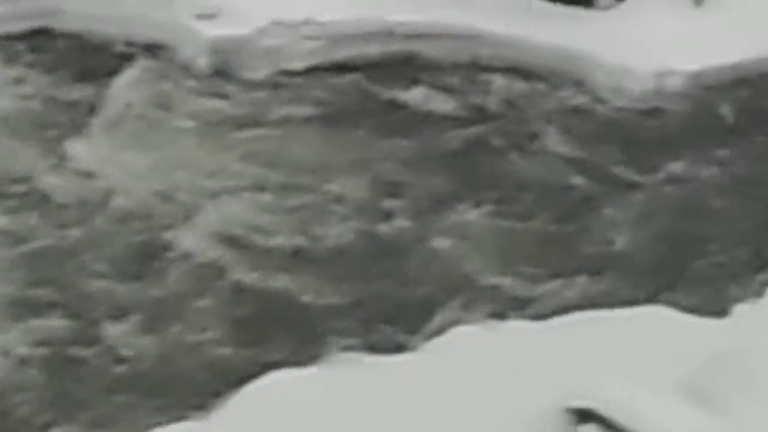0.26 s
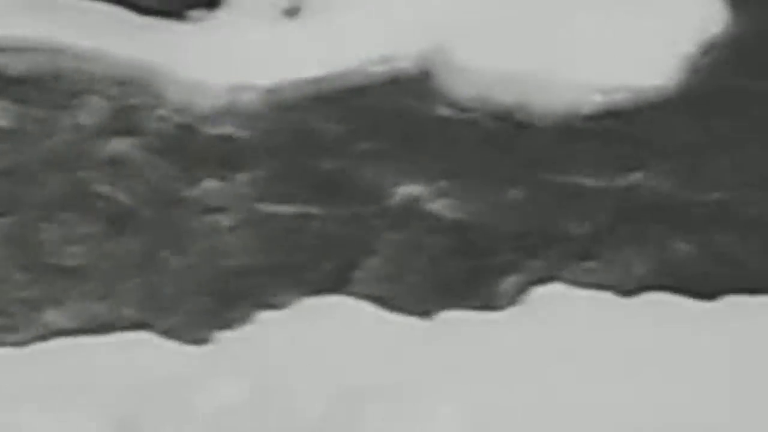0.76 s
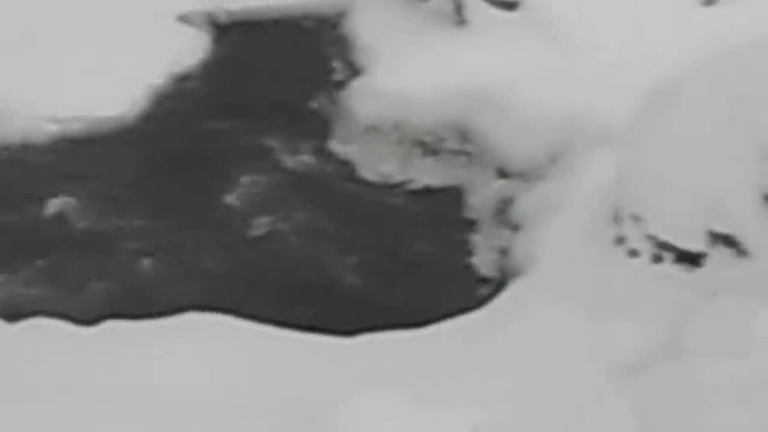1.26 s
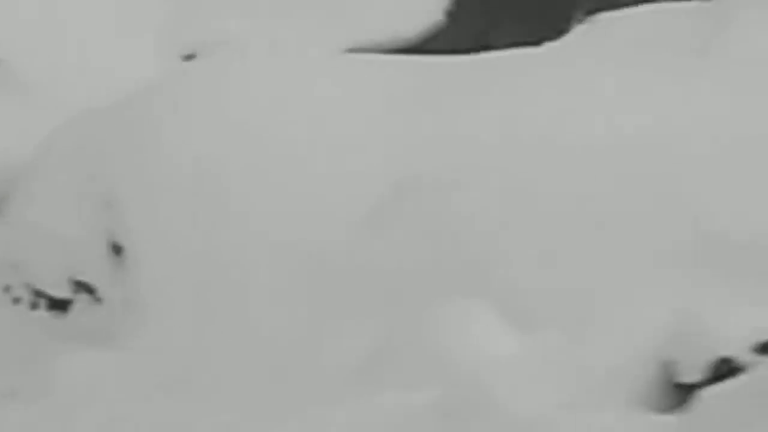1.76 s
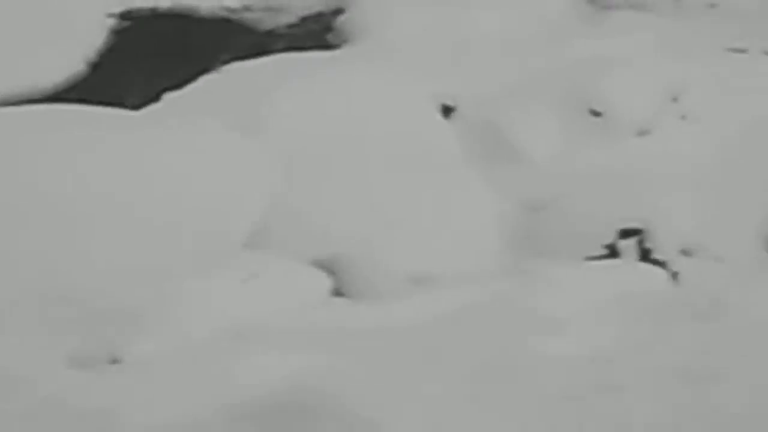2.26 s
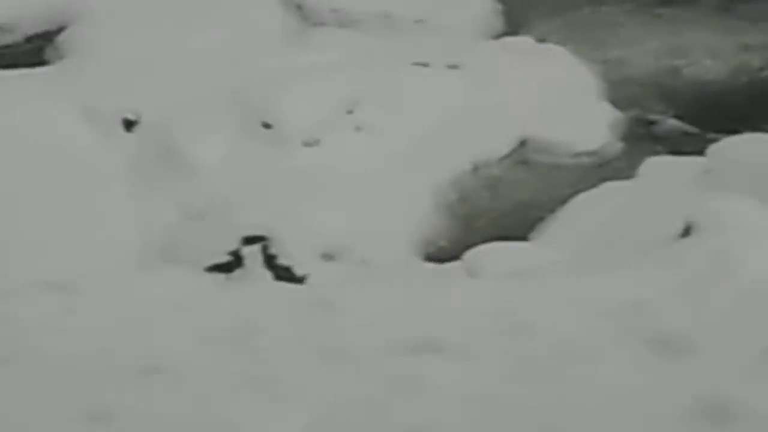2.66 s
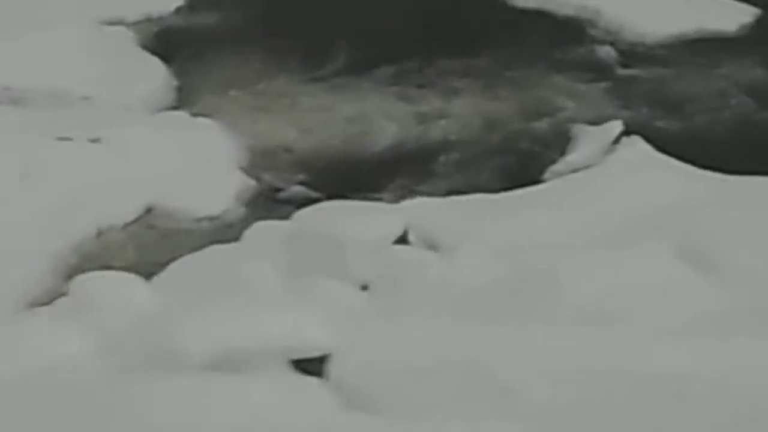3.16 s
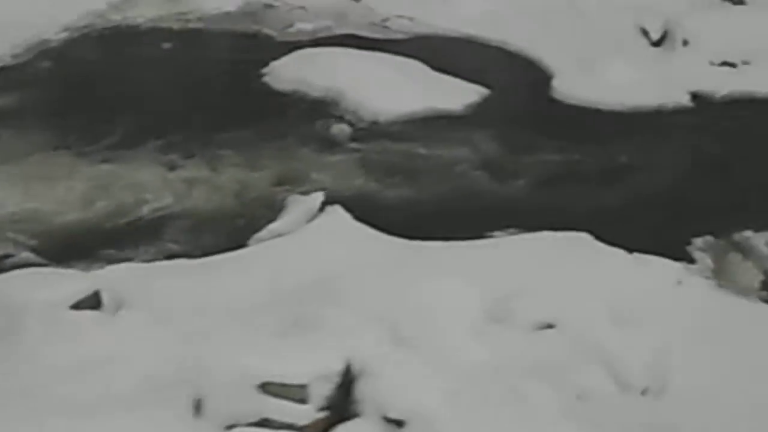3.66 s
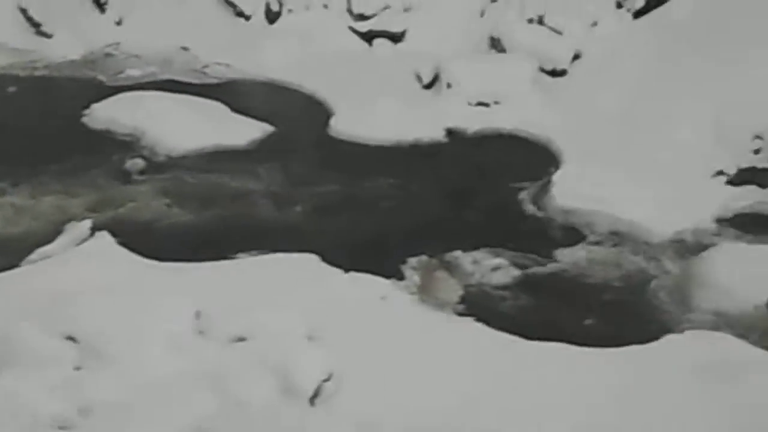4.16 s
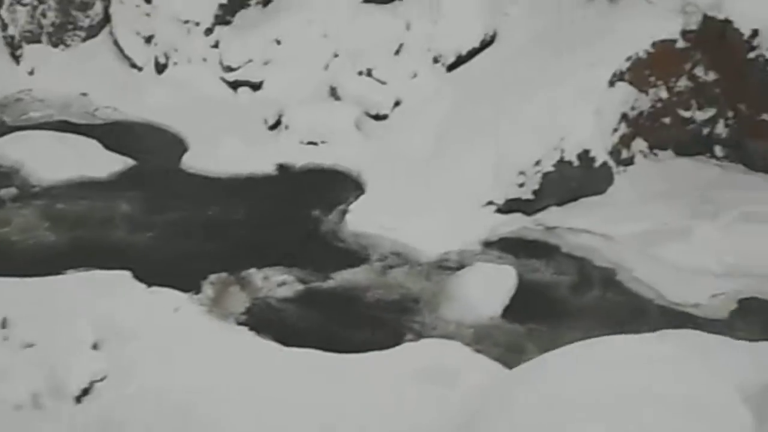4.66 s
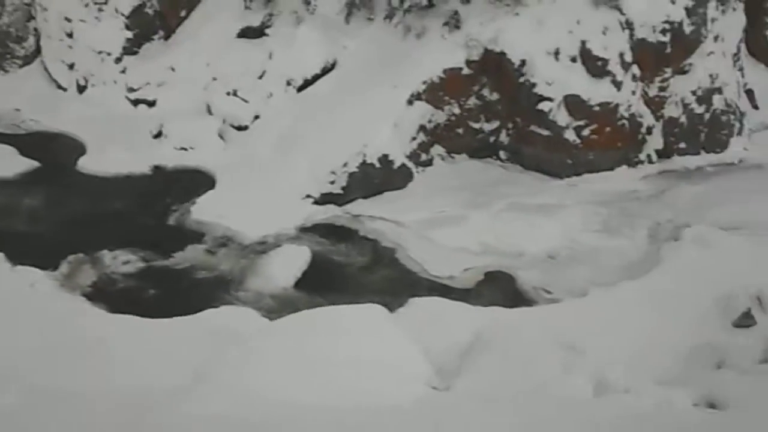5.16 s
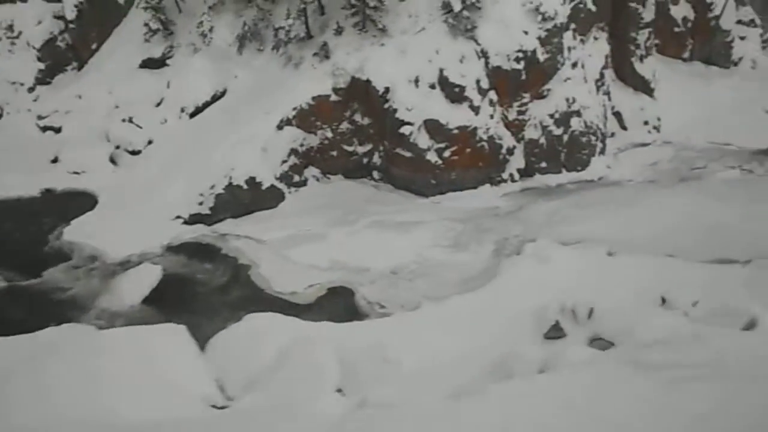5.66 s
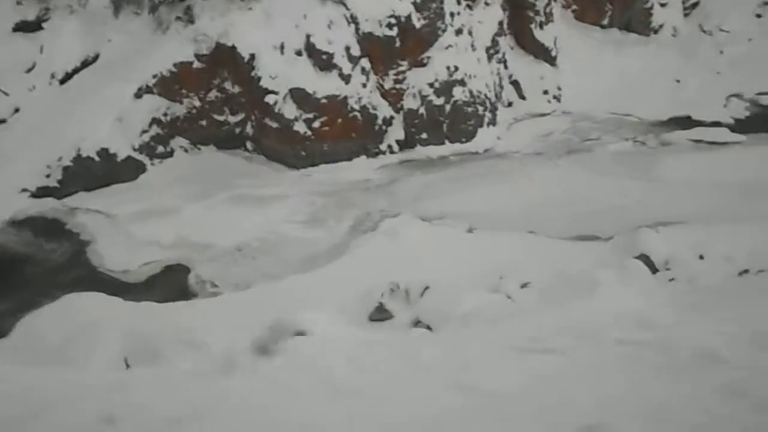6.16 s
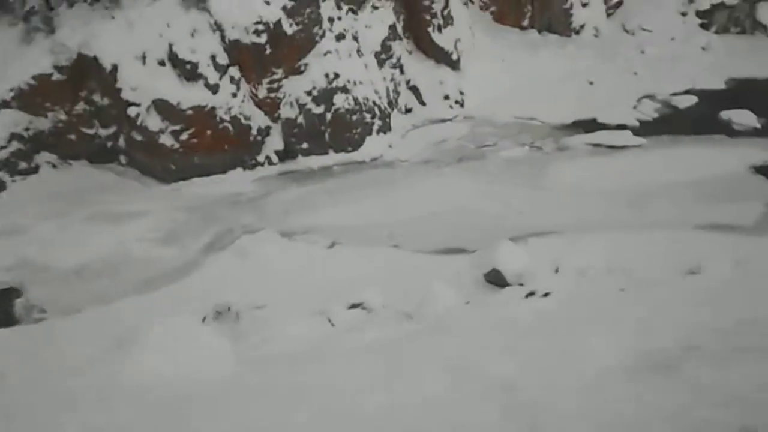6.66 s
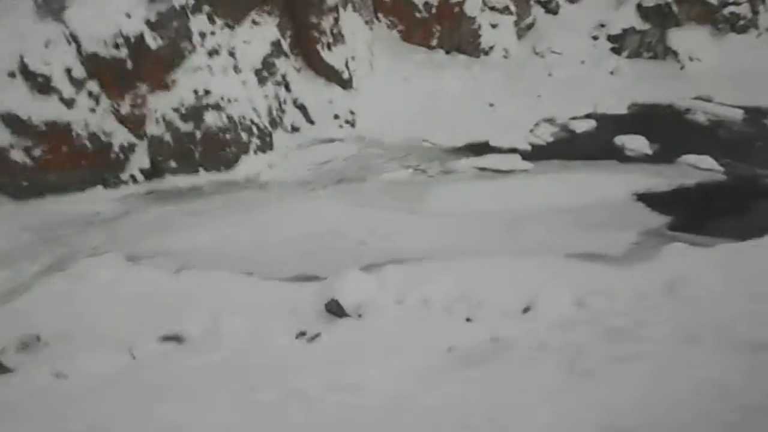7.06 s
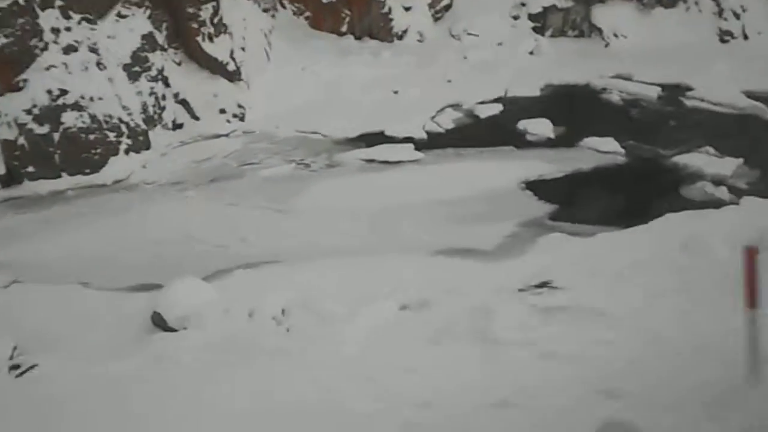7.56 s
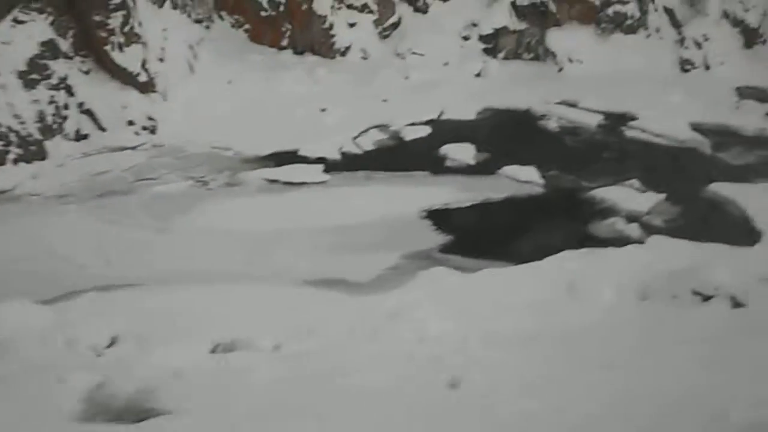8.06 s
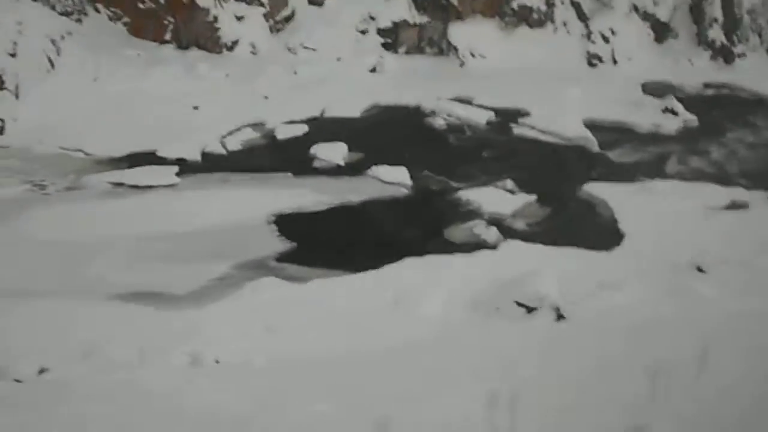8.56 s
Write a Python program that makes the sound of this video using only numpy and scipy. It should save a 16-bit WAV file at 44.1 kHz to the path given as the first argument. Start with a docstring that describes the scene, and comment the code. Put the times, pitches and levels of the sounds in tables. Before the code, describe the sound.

A train rolls slowly for about nine seconds, heard from a window seat inside a padded carriage. A low rumble and muffled wheel roar run throughout, with a soft, rapid motor throb, a faint hum, thin hiss and very faint high singing from the wheels. In the first second, panels rub and loose fittings click close to the microphone. Scattered clicks continue, and around 2.5 to 3 seconds the track jolts the carriage, bringing a deeper boom, dull thumps under the floor and a cluster of clicks. More single clicks and soft knocks fall between 4 and 5.5 seconds. At 6 seconds a nearby fitting gives one brief squeak with a sharp click. Soft creaking and further clicks follow around 7 seconds and just before 8, and two more low bumps come between 8 and 8.5 seconds as the rumble carries on.

```python
"""A low sway and a booming floor, heard from a window seat in a slowly rolling railway carriage.
Uneven track shakes the body, more so at each jolt; the wheels roar through the walls and sing faintly.
A small motor knocks its housing about 21 times a second over a faint hum; the running gear thumps below.
Panels rub as the carriage flexes. Close to the microphone loose fittings click in a short, padded echo,
and at 6 s one of them sticks and slips in a brief squeak. Mono, with a thin airy hiss behind it all."""
import sys
import numpy as np
from scipy import signal
from scipy.fft import rfft, irfft, next_fast_len
from scipy.io import wavfile
from scipy.ndimage import uniform_filter1d

SR = 44100
rng = np.random.default_rng(int(sys.argv[2]) if len(sys.argv) > 2 else 0)


def output_pcm(signal):
    """Save a mono or channel-first signal as 16-bit PCM at the path in sys.argv[1].

    Samples are clipped to [-1, 1] before scaling.
    """
    pcm = np.clip(np.atleast_2d(signal).T, -1, 1) * 32767
    wavfile.write(sys.argv[1], SR, np.round(pcm).astype(np.int16))


N = 388962
TIME = np.arange(N) / SR

# echo of the compartment: f/Hz, t60/s
CABIN_DECAY = [(200, 0.14), (1500, 0.33), (5000, 0.27), (10000, 0.15)]
# airy hiss: f/Hz, relative density/dB
HISS_SPECTRUM = [(1200, -7), (2200, 4), (3000, 1), (4200, 0), (5000, -4.5), (6500, -6), (8200, -7.5),
                 (10000, -7), (11000, -7.5)]
# its course: t/s, relative level/dB
HISS_LEVEL = [(0, -55), (0.85, -58.5), (1.3, -57), (3.6, -58), (6.2, -56), (7.6, -58), (8.15, -55),
              (8.82, -58)]
# singing modes of the wheels: start/s, end/s, f/Hz, glide/Hz, width/Hz, level/dB
WHEEL_MODES = [(0.3, .76, 4420, -80, 420, -66), (.8, 1.7, 5250, -1, 400, -74),
               (1.303, 3.3, 3990, 0, 250, -71.5), (2.8, 5.15, 3990, -40, 200, -69),
               (3.65, 4.35, 6200, 2, 450, -76), (4.305, 4.335, 5350, -100, 250, -68),
               (4.337, 4.375, 5240, -100, 280, -62), (4.338, 4.395, 5950, 300, 400, -66),
               (4.93, 5.55, 5450, -1, 350, -70), (6.365, 6.415, 8100, -5, 400, -69.5),
               (6.425, 6.47, 7750, -200, 800, -66), (6.75, 7.75, 6250, -2, 300, -76),
               (7.79, 8.2, 5600, -1, 450, -68), (7.83, 8.2, 6660, 0, 800, -74),
               (8.15, 8.62, 5550, 5, 450, -74)]
# rubs of panels and seats: start/s, end/s, f/Hz, glide/Hz, width/Hz, level/dB
RUBS = [(0, 0.06, 4450, -2, 3500, -54), (.2, .94, 1600, 1, 1200, -58.5), (.345, .405, 944, 0, 1000, -51),
        (0.389, .56, 872, 3, 700, -55), (0.341, 0.398, 3000, 0, 3600, -52.5),
        (0.279, .85, 2750, 1, 900, -66), (0.382, .8, 5770, 0, 1400, -72),
        (1.135, 1.235, 7800, 0, 5600, -62), (2.05, 2.6, 5150, -1, 600, -70),
        (2.99, 3.23, 3700, 3, 2000, -58.5), (3.208, 5.2, 3424, 0, 1100, -70),
        (6.726, 6.837, 3840, -500, 2200, -56.5), (6.761, 7.202, 1167, -3, 800, -54.5),
        (7.85, 8.3, 5800, -400, 2200, -66), (7.959, 8.5, 3145, 399, 2100, -60),
        (8.05, 8.79, 3860, 700, 1300, -62)]
# steady hum: f/Hz, rms level/dB, wander/Hz
HUM_TONES = [(333.2, -49, .65), (614, -64.5, 1.7), (670.6, -60, 1.8), (913, -66.5, 1.8), (1004, -58, 1.05),
             (1687, -71.5, 1.81)]
# speed of the motor: t/s, rate/Hz
MOTOR_SPEED = [(0, 20.73), (0.8, 20.43), (1.3, 20.88), (3.6, 20.52), (4.2, 20.77), (6.55, 20.56),
               (6.85, 21.3), (8.82, 21.25)]
# its throb at the seat: t/s, level/dB
MOTOR_LEVEL = [(0, -42.5), (1.4, -42.5), (4.8, -42.5), (7.1, -41), (8.82, -41)]
# modes of its housing: f/Hz, relative level/dB, t60/s
HOUSING_MODES = [(162, -17, 0.027), (338.3, -11.5, 0.15), (420, 2.5, 0.089), (484, -4.5, 0.041),
                 (850, -28, 0.026)]
# knocks from under the floor: t/s, level before the envelope/dB, f/Hz
KNOCKS = [(0.068, -27, 173), (0.358, -37, 730), (1.061, -25, 119), (2.476, -30, 204), (2.533, -33, 383),
          (2.629, -20.5, 84.5), (2.631, -30.5, 263), (3.63, -38, 550), (4.226, -25.5, 145),
          (4.234, -38, 510), (5.148, -29.5, 245), (5.735, -35, 342)]
# partials of the squeak, first upward: rms level/dB, change in the tight grip/dB, growth/(dB/s)
SQUEAK_PARTIALS = [(-37, -9, 20), (-46.5, 10.5, 17), (-48, 0, -13), (-62, -4, 50), (-61, -1, 30),
                   (-60, -3, 42)]
# resonances and hollows of the panel that carries the fittings: f/Hz, width/Hz, gain/dB
PANEL_MODES = [(1620, 600, -0.5), (2200, 230, -1.5), (4150, 970, -2.5), (4800, 790, 1.5), (7200, 600, -2.5),
               (8600, 850, -4), (9400, 700, 4.5)]
# nearby clicks: t/s, level above 1800 Hz/dB, body colour/dB, treble colour/dB, t60/s, ring/Hz, ring/dB
CLICKS = [(0.078, -37, 17.5, -1.5, 0.052, 4750, 7.5), (0.2372, -45, 17, -18, 0.055, 1500, 10),
          (0.2465, -37.5, 9, -3, .067, 1650, 8), (0.2536, -37, 13, -3, 0.055, 1850, 4),
          (0.3608, -50, 13, -12, 0.13, 1300, -2), (0.4671, -46.5, 17, -2, 0.12, 2180, 3),
          (0.4918, -38.5, 15, -4, 0.078, 4700, 5), (0.514, -46, 17, -5, 0.1, 4700, 2),
          (1.061, -33.5, 13, -2, 0.042, 4760, 5), (1.4626, -46, 7, -14, 0.12, 5000, 3),
          (1.549, -38, 13, -5, .04, 4750, 8), (1.786, -33.5, 6.5, -8, 0.047, 3000, 4.5),
          (1.832, -44, -1, -17, 0.043, 3200, 2), (2.376, -37.5, 7, -12, 0.039, 2800, 6),
          (2.4528, -43, 10, -13, 0.11, 3600, 3), (2.533, -38, 12, -11, .048, 2700, 4),
          (2.5544, -31.5, 11.5, -1, 0.047, 4570, 8), (2.584, -38, 10, -6, 0.057, 5100, 5),
          (2.617, -47.5, 18, 3, 0.065, 9400, 7), (2.808, -47.5, 5, -12, 0.047, 4700, 8),
          (2.833, -37, 12, -6, 0.03, 7040, 7), (2.869, -52, 7, -12, 0.08, 4500, 9),
          (2.914, -40, 9, -6, 0.031, 7200, 5), (3.1009, -49, 5, -12, .07, 5000, 4),
          (3.9351, -36, 5.5, -12.5, 0.058, 3620, 5.5), (4.236, -42, -2, -10, 0.12, 6200, 7),
          (4.488, -48, 8, -13, 0.062, 3060, 1), (4.5426, -48.5, 6, -14, 0.054, 3480, 5),
          (4.594, -33.5, 5, -8.5, .055, 2900, 6.5), (4.6374, -44, 14, -12, 0.054, 2900, 2),
          (5.1248, -49, 4, -12, 0.064, 3610, 6), (5.157, -41, 6, -11, 0.049, 3200, 1),
          (5.3384, -38, 9.5, -8, 0.05, 5300, -1), (5.5168, -44, 9.5, -15, 0.079, 1500, 2),
          (5.5352, -42, 2, -19, 0.044, 5400, 10), (6.0077, -38.5, -3, -21, 0.032, 5300, 6),
          (6.0568, -28.5, 7, -17, 0.017, 4450, 10.5), (6.074, -44, 6, -16, 0.036, 2200, 10),
          (6.498, -36, -6, -22, 0.014, 3500, 6), (6.823, -42, 17, -7, 0.036, 4700, 6),
          (6.895, -35.5, 16, -11, 0.022, 2400, 2), (6.9246, -38.5, 14, -8, 0.03, 2350, -2),
          (6.9335, -38, 5, -7, 0.048, 4300, 4), (7.02, -36, 6.5, -5, 0.043, 1500, 4),
          (7.043, -40.5, 9, -17, 0.045, 5300, 8), (7.7292, -30, 12, -7, 0.014, 1900, 3),
          (7.745, -42, 16, -8, 0.032, 2400, 0), (7.795, -35.5, 2, -18, 0.016, 4150, 9),
          (7.968, -41, -3, -12, 0.029, 2600, 5), (8.256, -33, 4, -8, 0.034, 6300, 4),
          (8.4252, -45.5, 9, -13, 0.11, 2800, 4)]
# rolling noise through the walls: f/Hz, relative density/dB
ROAR_SPECTRUM = [(90, 1), (120, 15.5), (148, 12.5), (178, 9), (198, 4), (235, 7.5), (355, 9), (400, -1),
                 (480, 2), (540, 0), (630, -1.5), (900, -3), (965, -6.5), (1130, -4), (1750, -14.5),
                 (2100, -22.5), (4000, -58)]
# its course: t/s, relative level/dB
ROAR_LEVEL = [(0, -45), (1.4, -46), (2.6, -45.5), (3, -46), (4.3, -46), (6.2, -48.5), (6.9, -46.5),
              (7.5, -45.5), (8.2, -46.5), (8.82, -46.5)]
# its treble against the rest: t/s, gain/dB
ROAR_TREBLE = [(0, 3.5), (1.1, 3), (2.6, 1.5), (4.2, -2), (5.6, .5), (6.6, 0.5), (7.4, -3.5), (8.2, -5.5),
               (8.82, 1)]
# sway of the body: f/Hz, relative density/dB
SWAY_SPECTRUM = [(8, -6), (17, -1.5), (22, -2.5), (29, -1.5), (37, -5), (43, -25), (50, -19.5), (62, -23)]
# boom of the floor: f/Hz, relative density/dB
BOOM_SPECTRUM = [(56, -7.5), (64, -5), (72, 0), (84, -11), (103, -9), (112, -17), (135, -15), (170, -22)]
# narrow resonances of the floor: f/Hz, width/Hz, relative level/dB
FLOOR_MODES = [(74.33, 3.1, -2.5), (93.43, 4.06, -0.5)]
# shaking by the uneven track, jolts aside: t/s, sway/dB, boom/dB
RIDE = [(0, -25, -38.5), (0.9, -24.5, -38.5), (1.3, -23, -38), (1.9, -30.5, -34.5), (2.3, -23.5, -32.5),
        (2.7, -25, -29), (3.3, -23.5, -31), (3.8, -23.5, -37), (4.3, -25.5, -32), (4.9, -27.5, -36),
        (5.3, -30.5, -30.5), (5.8, -25.5, -34), (6.3, -30, -38), (6.9, -30, -40), (7.3, -32, -32.5),
        (7.9, -27.5, -41.5), (8.3, -28, -47), (8.82, -34.5, -34)]
# bumps in the track (a negative rise counts as none): t/s, sway rise/dB, boom rise/dB
JOLTS = [(0.56, 0, 11), (0.74, 6.5, 3), (1.07, 2.5, 4), (2.49, 8.5, 4), (2.65, 12.5, 1.5), (2.9, 7.5, 0.5),
         (3.16, 4, 5.5), (4.06, -2.5, 6.5), (5.1, -2, 8), (8.16, 7, 4), (8.51, 11, 2)]


def amp(db):
    """Decibels to gain."""
    return 10 ** (np.asarray(db) / 20)


def unit(x):
    """Scales to rms 1."""
    return x / np.sqrt(np.mean(x ** 2) + 1e-20)


def at_hz(points, hz):
    """Reads a table on a log-frequency axis."""
    f, value = np.transpose(points)
    return np.interp(np.log(hz + 1), np.log(f + 1), value)


def curves(rows):
    """Every column after the first as a curve in time."""
    s, *columns = np.transpose(rows)
    return [np.interp(TIME, s, c) for c in columns]


def add(mix, s, sound):
    """Mixes a sound in at s seconds."""
    part = mix[max(round(s * SR), 0):][:len(sound)]
    part += sound[:len(part)]


def noise(spectrum):
    """Noise of a given spectrum, falling steeply outside it."""
    hz = np.fft.rfftfreq(N, 1 / SR) + 1e-3
    skirts = 1 / (1 + (spectrum[0][0] / hz) ** 6 + (hz / spectrum[-1][0]) ** 6)
    return unit(irfft(rfft(rng.standard_normal(N)) * amp(at_hz(spectrum, hz)) * skirts, N))


def band(hz, width_hz, size=N):
    """Noise in one resonance; at 0 Hz, a random drift."""
    f = np.fft.rfftfreq(size, 1 / SR)
    return unit(irfft(rfft(rng.standard_normal(size)) / (1 + (2 * (f - hz) / width_hz) ** 4), size))


def sustained(x, seconds):
    """Evens out the slow swells of a vibration, keeping its quick ones."""
    size = max(int(seconds * SR), 2)
    return x / np.sqrt(uniform_filter1d(uniform_filter1d(x ** 2, size), size) + 1e-9)


def friction(strokes, fade_share):
    """Strokes of friction, each in one gliding resonance that swells and fades."""
    out = np.zeros(N)
    for start, end, hz, glide_hz, width_hz, db in strokes:
        size = max(int((end - start) * SR), 64)
        phase = 2 * np.pi * np.cumsum(hz + glide_hz * np.linspace(-.5, .5, size)) / SR
        a, b = (band(0, width_hz, next_fast_len(size))[:size] for _ in range(2))
        stroke = unit(a * np.cos(phase) + b * np.sin(phase))
        add(out, start, amp(db) * stroke * signal.windows.tukey(size, fade_share))
    return out


def cabin_echo(x):
    """The padded compartment around the microphone: sparse reflections that die quickly."""
    taps = rng.standard_normal(SR // 3) * (rng.random(SR // 3) < 2500 / SR)
    hz, t, spectra = signal.stft(taps, SR, nperseg=256)
    tail = signal.istft(spectra * amp(-60 * t / at_hz(CABIN_DECAY, hz)[:, None]), SR, nperseg=256)[1]
    return signal.fftconvolve(x, np.r_[np.zeros(SR // 300), tail / np.linalg.norm(tail)])[:N]


def air_and_wheel_song():
    """Farthest back: an airy hiss, with high modes of the wheels wavering faintly in it."""
    singing = friction(WHEEL_MODES, fade_share=0.5)
    hiss = noise(HISS_SPECTRUM) * amp(curves(HISS_LEVEL)[0] - 2 + 0.35 * band(0, 40))
    return hiss + singing * amp(3.5 * band(0, 10))


def rubbing():
    """Soft, grainy friction of panels and seats as the carriage flexes."""
    return friction(RUBS, fade_share=0.46) * amp(band(0, 200))


def hum():
    """Faint steady tones, each wandering a little in level and pitch."""
    out = np.zeros(N)
    for hz, db, wander_hz in HUM_TONES:
        gain = amp(db + 2.5 * band(0, 5.2))
        phase = 2 * np.pi * np.cumsum(hz + wander_hz * band(0, 8.9)) / SR
        out += gain * np.sin(phase)
    return np.sqrt(2) * out


def motor():
    """Each turn of a small motor gives a soft knock that rings its housing."""
    turns = np.cumsum(curves(MOTOR_SPEED)[0]) / SR + .62
    beats = np.diff(np.floor(turns), prepend=0) * amp(.5 * rng.standard_normal(N))
    t = np.arange(SR // 6) / SR
    # neighbouring modes swing against each other, so the ring takes a few ms to build
    ring = sum((-1) ** k * amp(db - 60 * t / t60) * np.sin(2 * np.pi * hz * t)
               for k, (hz, db, t60) in enumerate(HOUSING_MODES))
    throb = unit(signal.oaconvolve(beats, ring * (1 - np.exp(-t / 0.0014)))[:N])
    return amp(curves(MOTOR_LEVEL)[0]) * throb


def gear_knocks(rise_s=.003, fall_s=.026):
    """Heavily damped thumps of the running gear under the floor, too broad to have a clear pitch."""
    out, t = np.zeros(N), np.arange(SR // 4) / SR
    for s, db, hz in KNOCKS:
        thump = sustained(band(hz, 1.05 * hz, len(t)), .02)
        add(out, s, amp(db) * thump * (1 - np.exp(-t / rise_s)) * np.exp(-t / fall_s))
    return out


def squeak(centre_s=6.008, swell_s=0.06, grip_at_s=5.998, grip_s=0.02):
    """A nearby fitting sticks and slips; in the tightest grip the pitch sags and the octave takes over."""
    t = np.arange(-SR // 4, SR // 4) / SR  # from the middle of the push
    swell = np.exp(-(t / swell_s) ** 4)
    grip = np.exp(-((centre_s + t - grip_at_s) / grip_s) ** 2)
    pitch_hz = 576 - 12 * grip - 80 * t
    jitter = 1 + 0.03 * band(0, 470, len(t))
    phase = 2 * np.pi * np.cumsum(pitch_hz * jitter) / SR
    tone = np.zeros(len(t))
    for k, (db, grip_db, growth) in enumerate(SQUEAK_PARTIALS, 1):
        shake_db = 2.5 * band(0, 130, len(t))
        tone += np.sqrt(2) * amp(db + grip_db * grip + growth * t + shake_db) * np.sin(k * phase)
    rub = amp(-53.5) * band(2900, 6600, len(t)) * (1 + 0.58 * np.cos(phase))
    out = np.zeros(N)
    add(out, centre_s + t[0], swell * (tone + rub))
    return out


def click(body_db, treble_db, t60, ring_hz, ring_db, slips_per_s=3600, ring_width_hz=950):
    """A dry crack: a sharp first break, then tiny dying slips that ring the fitting and its panel."""
    t = np.arange(4096) / SR
    hz = np.fft.rfftfreq(len(t), 1 / SR)
    decay = amp(-60 * t / max(t60, .01))
    catches = rng.random(len(t)) < slips_per_s / SR
    slips = rng.standard_normal(len(t)) * (catches + 0.18) * (1 - np.exp(-t / 0.0009)) * decay
    # the shorter the click, the more of it lies in the first break
    share = np.exp(-(t60 / 0.03) ** 2)
    burst = np.sqrt(share) * (t == 0) + np.sqrt(1 - share) * slips / np.linalg.norm(slips)
    colour = [(100, -27.5), (450, body_db + 2), (1400, body_db - .5), (4000, -1.5),
              (7500, treble_db), (11000, treble_db - 13.5)]
    # the panel is tuned a little differently at each spot
    modes = [(f * (1 + .025 * rng.standard_normal()), width, db) for f, width, db in PANEL_MODES]
    modes.append((ring_hz, ring_width_hz, ring_db))
    modes_db = sum(db / (1 + (2 * (hz - f) / width) ** 2) for f, width, db in modes)
    log_gain = np.log(amp(at_hz(colour, hz) + modes_db))
    # minimum phase: nothing rings before the break
    response = np.exp(np.conj(signal.hilbert(np.r_[log_gain, log_gain[-2:0:-1]])))[:len(hz)]
    spectrum = rfft(burst) * response
    bright = irfft(spectrum * (hz > 1800))
    return irfft(spectrum) * np.linalg.norm(decay) / np.linalg.norm(bright)


def fittings():
    """Loose parts close to the microphone click as the carriage flexes."""
    out = np.zeros(N)
    for s, level_db, *shape in CLICKS:
        add(out, s, amp(level_db) * click(*shape))
    return out


def wheel_roar(split_hz=1440):
    """Rolling noise heard through the walls; its treble slowly rises and falls."""
    roar = noise(ROAR_SPECTRUM) * amp(curves(ROAR_LEVEL)[0] + 7.5 + 0.59 * band(0, 30))
    treble = signal.sosfiltfilt(signal.butter(4, split_hz, "high", fs=SR, output="sos"), roar)
    return roar + treble * (amp(curves(ROAR_TREBLE)[0]) - 1)


def sway_and_boom(jolt_rise_s=0.043, jolt_fall_s=0.055):
    """Uneven track sways the body and booms the floor beneath the microphone, harder at each jolt."""
    sway_db, boom_db = curves(RIDE)
    for s, sway_rise_db, boom_rise_db in JOLTS:
        jolt = np.exp(-((TIME - s) / np.where(TIME < s, jolt_rise_s, jolt_fall_s)) ** 2)
        sway_db += max(sway_rise_db, 0) * jolt
        boom_db += max(boom_rise_db, 0) * jolt
    sway = sustained(noise(SWAY_SPECTRUM), 0.069)
    flutter_db = 1.2 * band(0, 17.6)
    floor = amp(-1) * noise(BOOM_SPECTRUM)
    floor += sum(amp(db) * band(hz, width) for hz, width, db in FLOOR_MODES)
    return sway * amp(sway_db - 0.13 + flutter_db) + sustained(floor, 0.14) * amp(boom_db)


def scene():
    """One microphone at a window seat; only the nearby clicks and squeak carry the cabin's echo."""
    near = fittings() + squeak()
    ride = sway_and_boom() + wheel_roar()
    background = air_and_wheel_song() + rubbing() + motor() + hum() + gear_knocks()
    return (background + ride + near + amp(-14) * cabin_echo(near))[None]


def record(dry, edge_hz=10750):
    """The band limit of the recorder."""
    return signal.oaconvolve(dry, signal.firwin(161, edge_hz, window=("kaiser", 8), fs=SR)[None], "same")


dry = scene()
out = record(dry)
output_pcm(out)
```